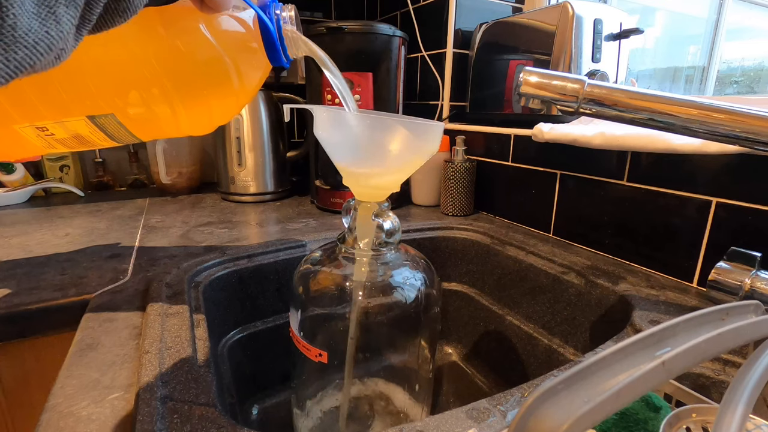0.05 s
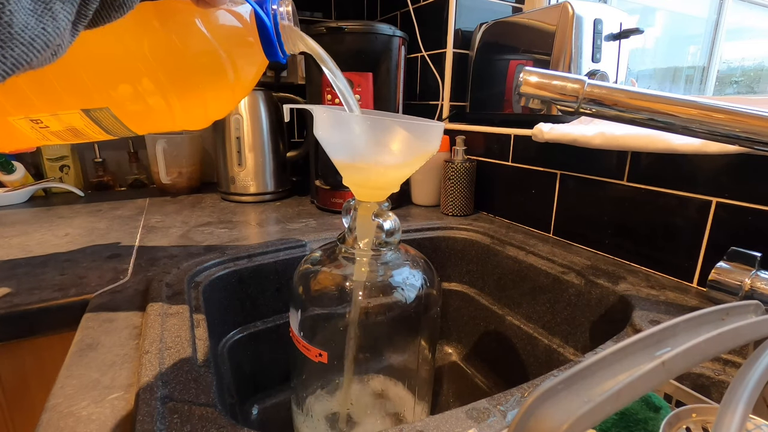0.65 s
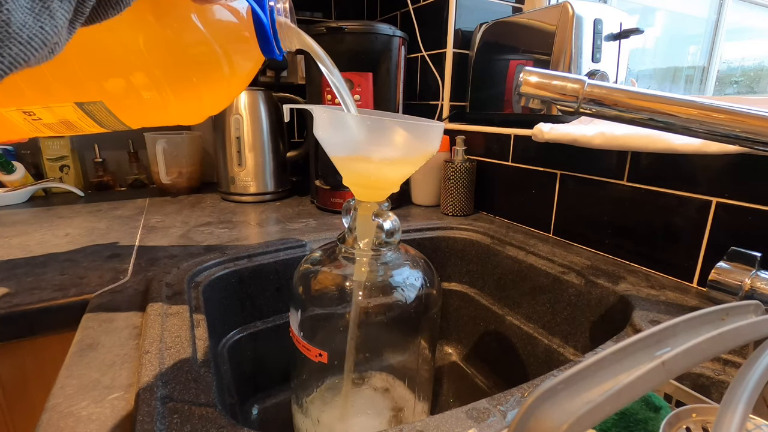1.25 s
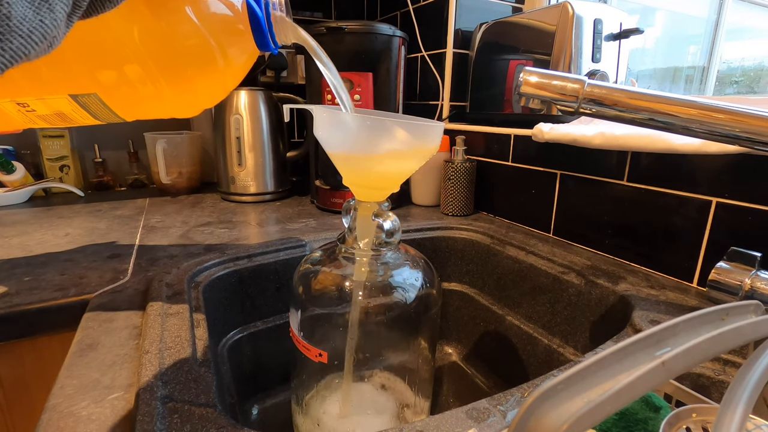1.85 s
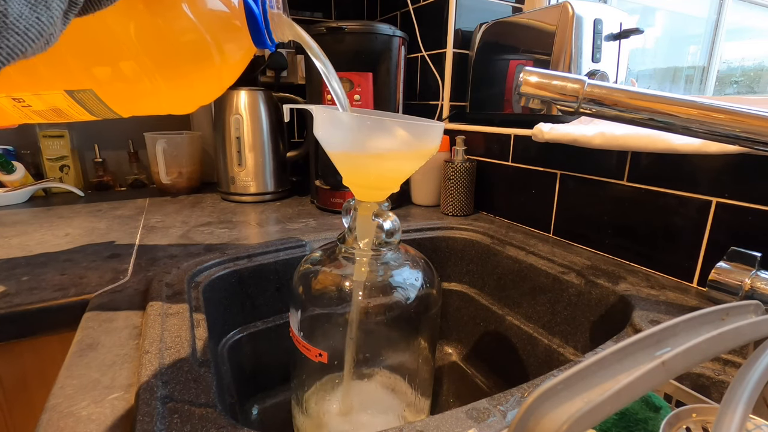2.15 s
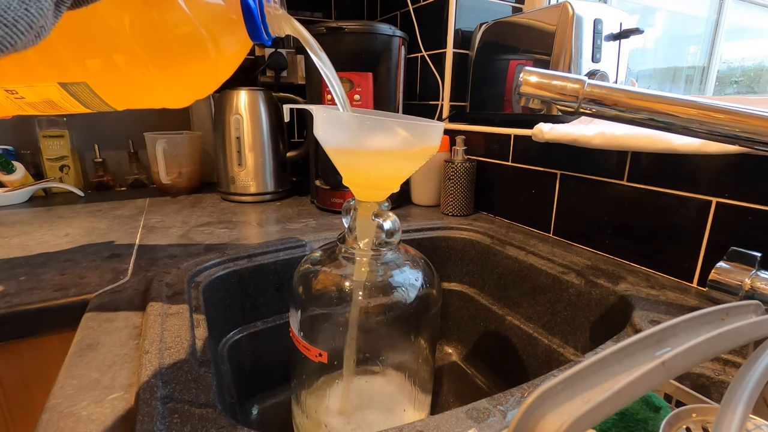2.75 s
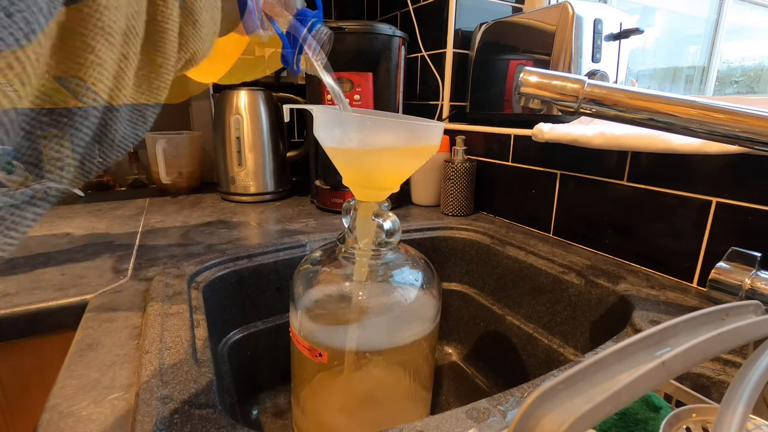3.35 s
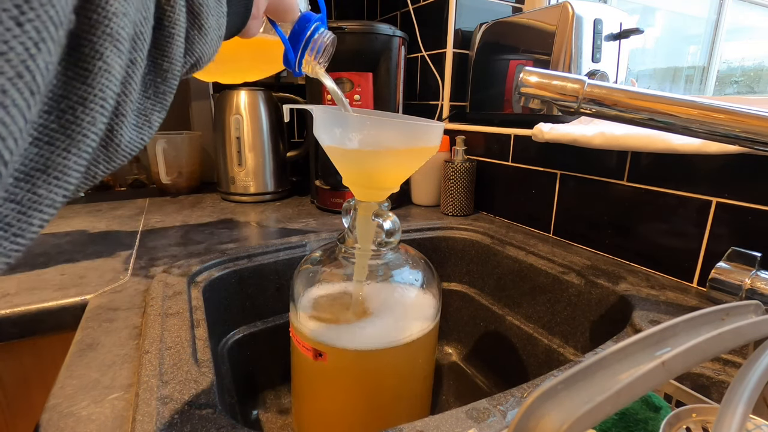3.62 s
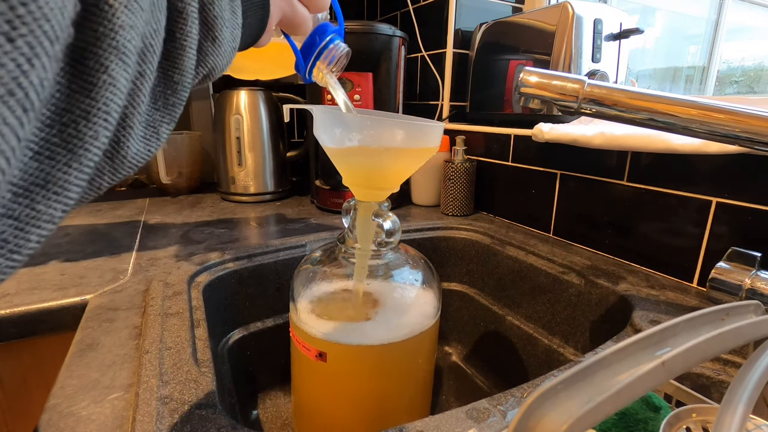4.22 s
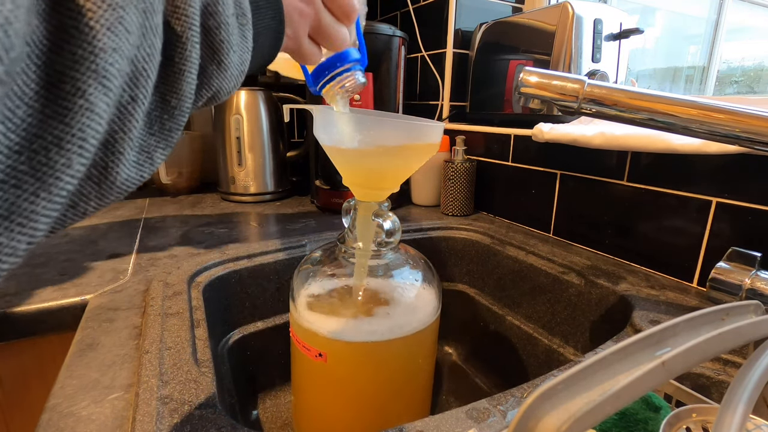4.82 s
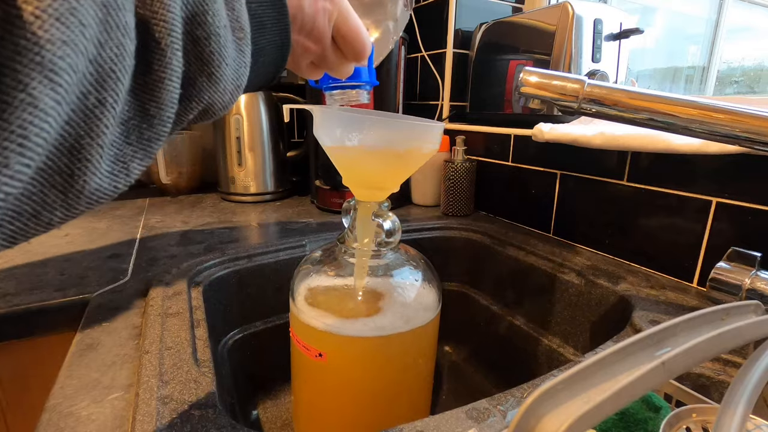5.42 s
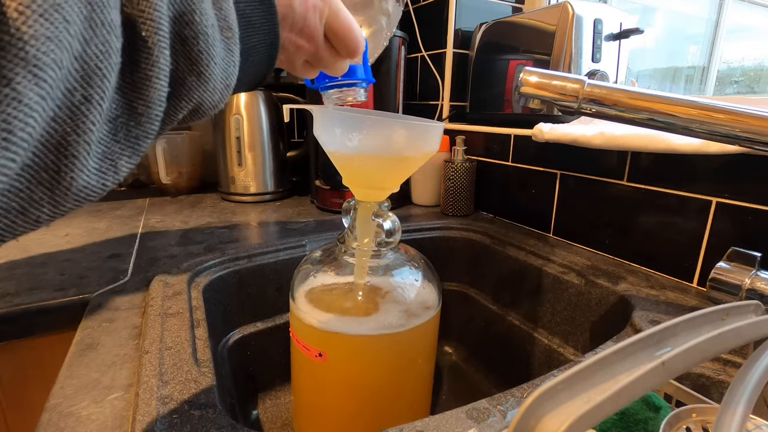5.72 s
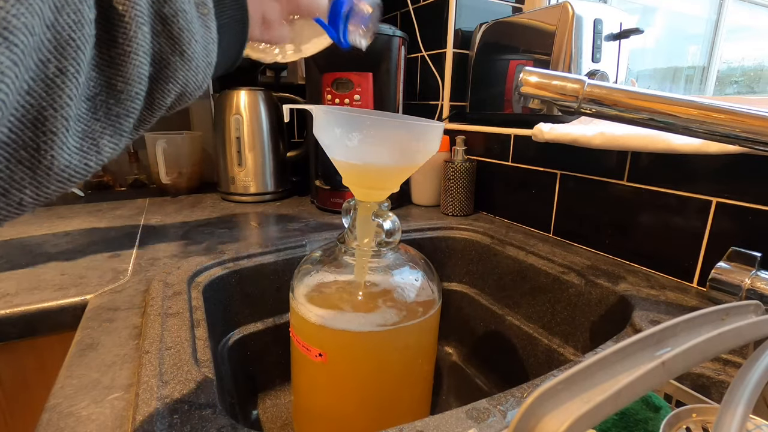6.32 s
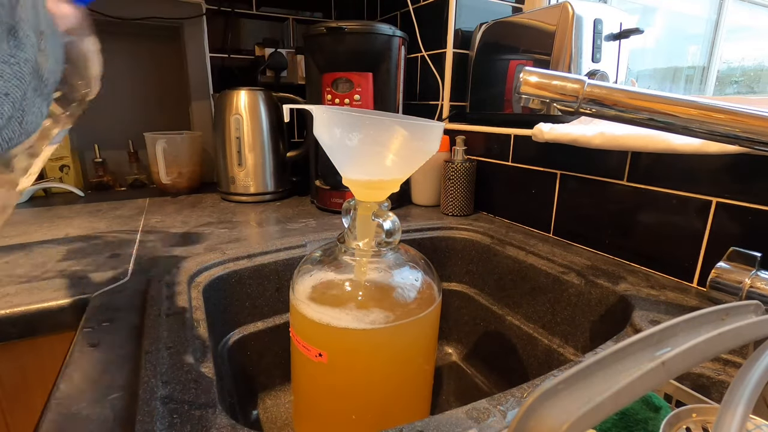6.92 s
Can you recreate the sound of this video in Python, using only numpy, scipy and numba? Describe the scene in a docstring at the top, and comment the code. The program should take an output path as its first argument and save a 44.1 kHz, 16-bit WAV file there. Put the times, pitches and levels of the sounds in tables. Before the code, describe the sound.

Liquid pours and bubbles into a large glass jar, thinning to a tinkling trickle before the funnel glugs and a bottle thumps on the worktop.

```python
"""A small kitchen, a stereo microphone close to the sink, an appliance humming in the background.
A drink gushes from a plastic bottle through a funnel into a big glass jar, and clouds of bubbles ring the
air inside, bright while it is nearly empty. From 3.4 s the jar is nearly full and burbles softly under
foam. Just after 5 s the dregs spatter into the funnel and the stream thins to a tinkling dribble.
The funnel glugs as it drains, and at 7 s the bottle knocks down on the worktop."""
import sys
import numpy as np
from scipy import signal
from scipy.fft import rfft, irfft, next_fast_len
from scipy.io import wavfile
from scipy.ndimage import map_coordinates
from numba import njit

SR = 44100
rng = np.random.default_rng(int(sys.argv[2]) if len(sys.argv) > 2 else 0)


def generate_wav(sig):
    """Save sig (samples, or channels by samples) to the path in sys.argv[1] as 16-bit PCM at SR."""
    pcm = np.round(np.clip(np.atleast_2d(sig).T, -1, 1) * 32767).astype(np.int16)
    wavfile.write(sys.argv[1], SR, pcm)


N = 316108
T = np.arange(N) / SR

# Appliance hum. Each row: pitch in Hz, level in dB.
HUM_TONES = [(98.5, -59), (199, -68.5)]
# Room tone, its stereo side signal and a rumble. Each row: frequency in Hz, gain in dB.
ROOM_TONE = [(20, -4), (45, -7), (70, -9), (100, 8), (135, -18.5), (195, -3.5), (260, -27), (340, -22),
             (420, -23), (750, -33), (1250, -30), (3300, -34), (8000, -40), (13000, -53)]
ROOM_TONE_SIDE = [(60, -8.5), (150, -5.5), (400, 1.5), (1200, 2), (4000, -2)]
RUMBLE = [(20, -43), (45, -16), (65, -2.5), (105, -4), (135, -14.5), (400, -30), (2000, -77)]
# Mid and side echo, then the tone at each side of the microphone. Each row: frequency in Hz, gain in dB.
ECHO_MID = [(60, -30), (350, -19), (700, -8), (2000, -3), (6000, -1), (13000, -1)]
ECHO_SIDE = [(60, -27), (350, -14), (700, -11), (1500, -9.5), (2800, -6.5), (5500, -3.5), (12000, -7.5)]
LEFT_TONE = [(100, -.3), (400, 0), (1500, -1.2), (5000, -2.8), (11000, -3.7)]
RIGHT_TONE = [(100, .2), (400, -.6), (1500, -1.1), (5000, -1.6), (11000, -1.3)]

# Modes of bottle and worktop, funnel and jar wall. Each row: pitch in Hz, level in dB, T60 in seconds.
WORKTOP_MODES = [(65.7, -21, 0.75), (84.6, -24.5, 0.68), (113.7, -10, 0.078), (127, -27, 0.25),
                 (218, -42.5, 0.55), (307, -27, 0.24), (354, -25.5, 0.36), (390, -29, 0.12),
                 (445.7, -36.5, 0.4), (485, -32.5, 0.12), (654, -34.5, 0.16), (720, -39, 0.16),
                 (795, -43, 0.25), (900, -46, 0.31), (1048, -38.5, 0.11), (1187, -31, 0.082),
                 (1245, -44, 0.3), (1710, -37, 0.19), (2020, -62, 0.33)]
FUNNEL_MODES = [(1197, -48.5, 0.2), (1274, -47, 0.21), (1750, -56, 0.1)]
GLASS_MODES = [(1881, -18, 0.14), (2331, -10, 0.12)]
# Modes of the air in the jar at three fill levels, and of the liquid with the sink under it.
# Each row: pitch in Hz, bandwidth in Hz, dB over the direct sound.
EMPTY_JAR_MODES = [(813, 75, 7), (1058, 106, 13), (1280, 15, 13.5), (1627, 20, 9.5), (1900, 40, 12),
                   (2110, 180, 9), (2312, 34, 13.5), (2506, 54, 0.5), (3100, 32, -16)]
FULL_JAR_MODES = [(550, 57, 12.5), (764, 79, 17), (1130, 110, 6), (1253, 22, 11), (1480, 31, 7.5),
                  (2520, 520, -5), (2830, 50, -8), (5450, 680, -26), (7800, 600, -14)]
BRIM_JAR_MODES = [(570, 12, 12.6), (1140, 90, 11.6), (1262, 40, 15.4), (1498, 15, 14.6), (2680, 100, 11),
                  (2930, 110, 12), (3320, 50, 17.6), (4840, 70, 5.9), (5140, 38, 6.2), (5200, 72, 4.7),
                  (6020, 170, 12)]
SINK_MODES = [(163.4, 22, 11), (215, 13.4, 20), (328, 14.6, 10)]
# Tone of the surface: bare, under foam, up at the neck. Each row: frequency in Hz, gain in dB.
BARE_TONE = [(200, 15), (550, 0.5), (800, 6), (1500, -6.5), (3000, -5), (4300, 1.5), (7000, -8),
             (10000, -16), (13000, -26)]
FOAMY_TONE = [(200, 22), (600, -18.5), (1100, -0.5), (1800, -4.5), (3000, -7), (4000, -13), (5800, -11.5),
              (6800, -19), (8500, -16), (10500, -30), (13000, -22)]
NECK_TONE = [(200, -15), (700, -9.5), (1100, -8.5), (1800, 0.5), (3000, -9), (4200, -2.5), (5800, 3),
             (6800, -25), (9000, -2), (10500, -44), (13000, -25)]
# Tone of the bottle's crack, spout pop, dregs, churning and mist. Each row: frequency in Hz, gain in dB.
CRACK_TONE = [(100, 14), (400, 11.5), (1200, -0.5), (2700, -2), (4000, -6.5), (5500, -15), (8000, -22),
              (13000, -46)]
POP_TONE = [(150, 11), (400, 17), (800, -13), (1250, 5.5), (2200, -9), (4000, -7.5), (6000, -18),
            (9000, -26), (13000, -52)]
DREGS_TONE = [(900, -12), (1600, -4), (2600, 0.5), (3500, -3), (4800, -6.5), (6000, -13), (7500, -19),
              (11000, -28)]
CHURN_TONE = [(70, -20), (160, 6.5), (240, 2.5), (330, -2.5), (420, -9.5), (600, 4.5), (1200, -36)]
MIST_TONE = [(6500, -0.5), (13500, -15)]

# The bottle meets the worktop. Each row: start in seconds, body in dB, crack in dB, loss in dB an octave.
BOTTLE_BLOWS = [(7.045, -24, -26, 0.5), (7.0499, 1.5, -27.5, 0), (7.088, -7.5, -43, 1)]
# Air breaks through the spout.
# Each row: start in seconds, peak in dB, pitch in Hz, glide in octaves a second, swell in seconds.
SPOUT_GLUGS = [(5.931, -47.5, 102, -3.5, 0.034), (6.762, -39, 295, -8, 0.0073),
               (6.775, -29.5, 339, -0.5, 0.013), (6.807, -40.5, 296, 4.5, 0.016),
               (6.838, -41, 332, 1.5, 0.011), (7.009, -39.5, 487, -15.5, 0.011),
               (7.028, -38.5, 380, 1.5, 0.012)]
# Collapsing foam, drops under the neck, deep gulps. Each row: start in seconds, level in dB, pitch in Hz.
FOAM_CRACKLES = [(3.52, -74, 7600), (3.631, -70, 7500), (3.771, -64, 4700), (3.816, -64.5, 6650),
                 (3.953, -63, 6100), (4.318, -67, 5400), (4.366, -64, 5640), (4.416, -67, 5500),
                 (4.461, -66, 4840), (4.5, -71, 7500), (4.706, -67, 5600)]
NECK_DRIPS = [(5.26, -55, 3150), (5.297, -60, 3170), (5.343, -63, 2790), (5.565, -59, 5600),
              (5.608, -60, 3320), (5.632, -58, 3260), (5.6835, -63, 2870), (5.772, -55, 3300),
              (5.821, -53, 2930), (5.857, -64, 5500), (5.888, -60, 6000), (5.906, -60, 2900),
              (5.935, -57, 5770), (5.9487, -52, 5060), (6.028, -56, 2930), (6.042, -60, 5970),
              (6.05, -59, 2910), (6.074, -60, 3250), (6.11, -60, 5200), (6.144, -59, 5670),
              (6.183, -66, 6080), (6.228, -61, 5770), (6.268, -64, 6050), (6.284, -63, 5370)]
DEEP_GULPS = [(0.273, -38, 220), (0.3, -39, 230), (0.396, -37.5, 203), (0.49, -36, 223), (0.62, -46, 240),
              (0.779, -42, 222), (0.914, -33, 232), (1.068, -51, 208), (1.872, -34.5, 220),
              (1.986, -37, 207), (2.29, -34.5, 204), (2.543, -42, 333), (2.552, -43, 563),
              (2.611, -37.5, 238), (2.621, -40, 330), (2.846, -38, 195), (3.045, -33, 212),
              (3.054, -45, 325), (3.075, -51, 464), (3.098, -39, 308), (3.127, -35, 197.6),
              (3.427, -47, 215), (3.528, -43.5, 161), (3.585, -50, 505), (3.807, -45, 158),
              (3.902, -42, 174), (3.925, -53, 317), (3.958, -40.5, 197), (3.975, -54, 590),
              (4.138, -49, 216), (4.186, -40, 164), (4.26, -41, 214), (4.335, -42, 195), (4.385, -34, 210),
              (4.41, -45, 348), (4.52, -49, 595)]
# Sliding runs of bubbles.
# Each row: start and length in seconds, first and last pitch in Hz, level in dB, scatter in octaves.
SLURP_RUNS = [(0.324, 0.028, 2100, 2210, -58, 0.26), (0.449, 0.017, 2230, 2230, -71, 0.26),
              (0.503, 0.21, 803, 827, -61.5, 0.18), (0.732, 0.03, 2180, 2320, -52.5, 0.12),
              (0.889, 0.016, 2080, 2570, -50, 0.33), (0.903, 0.017, 2600, 574, -48.5, 0.77),
              (1.303, 0.004, 2320, 2520, -43, .25), (1.586, 0.0042, 4200, 4560, -57, 0.65),
              (1.822, 0.029, 1750, 1400, -55.5, 0.12), (1.916, 0.044, 1390, 1160, -56, 0.23),
              (1.971, 0.018, 10500, 8400, -63.5, 0.5), (2.012, 0.035, 1350, 1560, -55.5, 0.42),
              (2.05, 0.028, 4100, 4360, -55, 0.67), (2.193, 0.035, 2060, 1550, -57, 0.13),
              (2.535, 0.12, 2200, 2350, -59.5, 0.41), (2.603, 0.014, 675, 985, -47.5, 0.29),
              (4.922, 0.024, 10900, 11500, -68, 0.28), (4.925, 0.0084, 2290, 2400, -50, 0.17),
              (5.027, 0.014, 1900, 2190, -55, .8), (5.058, 0.015, 4270, 3720, -54.5, 0.28),
              (5.948, 0.006, 5340, 4930, -56, 0.22)]
# Splashes. Each row: start in seconds, peak in dB, pitch in Hz, spatter in dB over the first bubble.
SINGLE_SPLASHES = [(0.113, -41.5, 2100, -12), (0.26, -41, 2470, -14), (0.318, -33.5, 2140, -19),
                   (0.438, -35.5, 2270, -21), (0.566, -36.5, 2030, 13), (0.737, -38, 2300, -26),
                   (0.774, -39.5, 2303, -6), (0.911, -39.5, 1480, 1), (1.047, -55, 1280, -17),
                   (1.181, -44, 2060, 7), (1.277, -46, 2350, -8), (1.307, -44, 1280, -12),
                   (1.867, -42.5, 900, 5), (1.994, -39, 857, 15), (2.05, -37, 2340, 3),
                   (2.616, -49, 2420, -12), (3.046, -42, 1887, -5), (3.962, -42.5, 1140, -7),
                   (4.142, -48, 815, 4), (4.293, -51.5, 1180, -7), (4.39, -44.5, 1020, -6),
                   (4.719, -46.5, 1256, -24), (5.904, -51.5, 1280, -5), (5.949, -49, 1130, -8),
                   (6.651, -57, 1290, -18)]
# The stream wanders near the wall and it sings. Each row: start and length in seconds, level in dB.
GLASS_SINGS = [(1.733, 0.016, -49), (2.49, 0.06, -52.5), (2.677, 0.053, -53.5), (2.959, 0.016, -51),
               (3.058, 0.02, -58), (3.17, 0.012, -58.5)]
# How hard the drink runs. Each row: time in seconds, flow in dB.
FLOW_CURVE = [(0, 0.5), (0.18, -2.5), (0.55, -0.5), (1.15, 0), (1.7, 2), (2.2, 2), (2.6, 4.5), (2.8, 1.5),
              (3.12, 2), (3.36, -7), (3.45, -2), (3.65, 1), (4.25, -5), (4.85, -2.5), (5.36, -8.5),
              (5.55, -4), (6.15, -8), (6.4, -13), (7.1, -9)]
# The stream plunges deeper (surges), sprays off the glass, or drags air under (gurgles).
# Each row: start and length in seconds, swell in dB. Each layer takes only a share of a surge.
STREAM_SURGES = [(0.25, 0.09, 9), (0.49, 0.11, 6), (0.91, 0.05, 7), (1.06, 0.04, 4), (1.44, 0.06, 3),
                 (1.87, 0.04, 6), (1.98, 0.08, 6.5), (2.28, 0.05, 5), (2.54, 0.11, 6.5), (2.92, 0.06, 7),
                 (3.045, 0.1, 13), (3.23, 0.06, 7), (3.43, 0.16, 5), (3.91, 0.08, 9), (4.14, 0.08, 8),
                 (4.27, 0.09, 6), (4.37, 0.07, 10), (4.54, 0.03, 6), (4.85, 0.03, 6), (5.79, 0.04, 7)]
WALL_SPRAYS = [(0.258, 0.01, 4), (0.57, 0.05, 2.5), (0.775, 0.01, 3.5), (0.91, 0.04, 4), (1.585, 0.01, 4.5),
               (1.995, 0.06, 5), (2.47, 0.13, 4), (3.07, 0.03, 6)]
AIR_GURGLES = [(0.242, 0.036, 15.5), (0.5, 0.04, 13.5), (0.597, 0.079, -6), (1.986, 0.018, 7),
               (2.2, 0.037, 4.5), (2.47, 0.073, 1), (2.65, 0.022, 1), (3.043, 0.076, 2),
               (3.585, 0.017, 3.5), (3.655, 0.056, 3.5), (3.89, 0.011, 2), (3.98, 0.015, 2.5),
               (4.042, 0.018, 8), (4.143, 0.058, 5), (4.335, 0.039, 7.5), (4.39, 0.024, 4),
               (4.515, 0.068, 6.5), (4.79, 0.02, 2.5), (4.858, 0.021, 4), (5.12, 0.02, 5),
               (5.466, 0.025, 6), (5.66, 0.041, 4.5), (5.804, 0.025, 5.5), (6.08, 0.07, 1.5)]

SKIN_S, FOAMY_S, BRIM_S = 0.88, 3.397, 5.26  # first skin of foam, jar nearly full, full to the neck
ROOM_T60_S = 0.4
# Each triple: large bubbles, small bubbles, fizz.
GUSH_DB, TRICKLE_DB, DRIBBLE_DB = (-69, -54, -61.5), (-60.5, -66, -74.5), (-62.5, -67, -72.5)
SURGE_SHARE, FLUTTER_DB = (0.2, 0.042, 0.024), (0.3, 0.97, 0.95)
BARE_DB = (-3, 3, 7)  # brighter until the skin of foam closes
DEEPEN_DB_PER_S = (2.5, -2, -1.96)  # the deepening pool favours large bubbles
FOAM_DB_PER_S = (0.3, 1.4, 5)  # fizz gains on the burble as the foam thickens


def undb(db):
    """Decibels to gain."""
    return 10 ** (np.asarray(db) / 20)


def unit(x):
    """Scale to rms 1."""
    return x / np.sqrt(np.mean(x ** 2))


def colour(x, points):
    """Filter by a curve of (Hz, dB) points."""
    hz, db = np.transpose(points)
    padded = np.pad(x, (0, 2048), "reflect", reflect_type="odd")
    size = next_fast_len(len(padded) + 4096)
    bin_hz = np.maximum(np.fft.rfftfreq(size, 1 / SR), 1)
    gain = undb(np.interp(np.log(bin_hz), np.log(hz), db))
    return irfft(rfft(padded, size) * gain, size)[:len(x)]


def convolve(x, response):
    """Pass a sound through an impulse response."""
    return signal.fftconvolve(x, response)[:len(x)]


def add(out, x, s):
    """Mix a short sound in at s seconds."""
    start = int(s * SR)
    out[start:start + len(x)] += x[:max(N - start, 0)]


def walk(moves_per_s):
    """Smooth random drift with a spread near 1."""
    return map_coordinates(rng.standard_normal(1000), [T * moves_per_s], order=3, mode="wrap")


def after(s):
    """Rises from 0 to 1 over 0.12 s around time s."""
    return np.clip(.5 + (T - s) / 0.12, 0, 1)


def plateau(s, length, attack_s, release_s):
    """Rises to 1 by time s, holds and ebbs."""
    return np.interp(T, [s - attack_s, s, s + length, s + length + release_s], [0, 1, 1, 0])


def swell_db(events):
    """The highest of the surges, sprays or gurgles at each moment."""
    return np.max([db * plateau(s, length, 0.017, 0.025) for s, length, db in events], axis=0)


def flow_db():
    """Strength of the stream over time."""
    return np.interp(T, *np.transpose(FLOW_CURVE))


def cavity(modes):
    """Impulse response: the direct sound plus ringing resonances."""
    t = T[:SR // 5]
    ringing = sum(undb(db) * 2 * np.pi * width / SR * np.exp(-np.pi * width * t)
                  * np.cos(2 * np.pi * hz * t) for hz, width, db in modes)
    return ringing + (t == 0)


def ring(modes):
    """A struck object: its modes fade, each at its own rate."""
    t = T[:SR // 3]
    return sum(undb(db - 60 * t / t60) * np.sin(2 * np.pi * hz * t) for hz, db, t60 in modes)


def burst(tone, main_t60_s, weak_t60_s, weak_db):
    """A sharp crack of noise that fades at two rates."""
    t = T[:SR // 3]
    fall = undb(-60 * t / main_t60_s) + undb(weak_db - 60 * t / weak_t60_s)
    return unit(colour(rng.standard_normal(len(t)), tone)) * fall * np.minimum(t / 0.00045, 1)


@njit
def bubbles(length, start, hz, cycles, size, rise):
    """Each bubble swells in a cycle, rings down 60 dB over its cycles and rises in pitch near the top."""
    out = np.zeros(length)
    for k in range(len(start)):
        life = int(cycles[k] * SR / hz[k]) + 2
        step = 2 * np.pi * hz[k] / SR
        wave = size[k] + 0j
        turn = np.exp(1j * step - np.log(1000.) / life)
        glide = np.exp(1j * step * rise / life)
        for i in range(min(life, length - start[k])):
            wave *= turn
            turn *= glide
            out[start[k] + i] += wave.imag * min(i * hz[k] / SR, 1.)
    return out


def cloud(lo_hz, hi_hz, cycles, spread_db, rise, count):
    """Bubbles of one size class at random moments: many weak, a few strong."""
    when, pitch, life, force = rng.random((count, 4)).T
    hz = lo_hz * (hi_hz / lo_hz) ** pitch
    size = hz * undb(-spread_db * np.log(1 - .99 * force))
    return bubbles(N, (when * N).astype(np.int64), hz, cycles * (.5 + life), size, rise)


def single_bubbles(rows, cycles, rise):
    """One bubble for each row of start, level and pitch."""
    s, db, hz = np.transpose(rows)
    return bubbles(N, (s * SR).astype(np.int64), hz, np.full(len(s), cycles), undb(db), rise)


def bubble_run(length, first_hz, last_hz, db, octaves, cycles, count=28):
    """A quick run of bubbles, scattered about a sliding pitch."""
    jitter, detune, force = rng.random((3, count))
    along = (np.arange(count) + jitter) / count
    start = (along * length * SR).astype(np.int64)
    hz = first_hz * (last_hz / first_hz) ** along * 2 ** (octaves * (detune - .5))
    run = bubbles(SR // 4, start, hz, np.full(count, cycles), undb(-10 * force), 0.029)
    return run * undb(db) / np.sqrt(np.sum(run ** 2) / (length * SR))


def kitchen():
    """A wavering appliance hum and a low rumble in the centre, room tone all round the microphone."""
    hum = sum(undb(db + 1.1 * walk(20)) * np.sin(2 * np.pi * hz * T + 1.13 * walk(8))
              for hz, db in HUM_TONES)
    mid, side = (undb(-59.5 + walk(3.8)) * unit(colour(rng.standard_normal(N), ROOM_TONE))
                 for _ in range(2))
    rumble = undb(np.interp(T, [4.5, 6.5], [-60, -66])) * unit(colour(rng.standard_normal(N), RUMBLE))
    return hum + mid + rumble + np.outer([1, -1], colour(side, ROOM_TONE_SIDE))


def echo(x, paths=6):
    """Short diffuse echo; its paths shift as the splash wanders about."""
    t = T[:SR // 3]
    fall = undb(-60 * t / ROOM_T60_S) * (t > .002)
    fall *= 1 + 9.3 * np.exp(-t / 0.003)  # the near walls answer first
    fall /= np.sqrt(np.sum(fall ** 2))
    shares = np.array([walk(7) for _ in range(paths)])
    shares /= np.sqrt(np.sum(shares ** 2, axis=0))
    return sum(share * convolve(x, fall * rng.standard_normal(len(t))) for share in shares)


def room(x):
    """Tiles and sink answer differently on each side of the microphone, most in the treble."""
    mid = x + echo(colour(x, ECHO_MID))
    side = echo(colour(x, ECHO_SIDE))
    return np.array([colour(mid + side, LEFT_TONE), colour(mid - side, RIGHT_TONE)])


def knock(push_cycles=0.97):
    """The bottle lands on its rim, settles and rocks once; the worktop booms."""
    out, t = np.zeros(N), T[:SR // 3]
    lowest_hz = WORKTOP_MODES[0][0]
    for s, body_db, crack_db, dull_db in BOTTLE_BLOWS:
        body = 0
        for hz, db, t60 in WORKTOP_MODES:
            push = np.minimum(t * hz / push_cycles, 1)  # soft plastic: the deep modes build up last
            body += push * ring([(hz, db - dull_db * np.log2(hz / lowest_hz), t60)])
        add(out, undb(body_db) * body + undb(crack_db) * burst(CRACK_TONE, 0.025, 0.22, -8.5), s)
    return out


def glugs(jar):
    """Slugs of air swell and ring in the draining spout, and a film pops and rings the funnel."""
    out, t = np.zeros(N), T[:SR // 5]
    for s, db, hz, glide, swell_s in SPOUT_GLUGS:
        age = t / swell_s
        phase = 2 * np.pi * np.cumsum(hz * 2 ** (glide * t)) / SR
        add(out, undb(db) * age * np.exp((1 - age ** 2) / 2) * np.sin(phase), s)
    add(out, undb(-45) * burst(POP_TONE, 0.072, 0.29, -1.2) + ring(FUNNEL_MODES), s=6.763)
    rush = burst(POP_TONE, 0.68, 0.35, -16)  # air is sucked down after the last liquid
    rush *= np.minimum(T[:len(rush)] / 0.015, 1)
    add(out, undb(-51.5) * convolve(rush, jar), s=7.011)
    return out


def drips():
    """The last thread breaks into drops, each trapping one small bubble."""
    return single_bubbles(NECK_DRIPS, cycles=113, rise=0.023)


def dregs():
    """The last of the drink spatters into the funnel in one broad, rough burst."""
    spatter = unit(colour(cloud(900, 12000, 12, 3, .05, count=30000), DREGS_TONE))
    return undb(-56.5) * plateau(s=5.072, length=0.057, attack_s=0.049, release_s=0.11) * spatter


def crackles():
    """The stream tears the foam, and many tiny bubbles burst together."""
    out = np.zeros(N)
    for s, db, hz in FOAM_CRACKLES:
        add(out, bubble_run(0.006, hz, hz, db, octaves=0.68, cycles=33), s)
    return out


def slurps():
    """A closing pocket of air sheds bubbles of steadily changing size."""
    out = np.zeros(N)
    for s, length, first_hz, last_hz, db, octaves in SLURP_RUNS:
        add(out, bubble_run(length, first_hz, last_hz, db, octaves, cycles=47), s)
    return out


def splashes(empty_jar, full_jar, count=14):
    """One bubble plinks, and at once a short spatter of mostly smaller ones follows."""
    out = np.zeros(N)
    follower = np.arange(count) > 0
    cycles = np.where(follower, 31, 64)
    for s, db, hz, spatter_db in SINGLE_SPLASHES:
        delay, pitch, force = rng.random((3, count)) * follower
        start = (delay ** 2 * .018 * SR).astype(np.int64)
        pitches = hz * 2 ** (2 * pitch - .5 * follower)
        size = undb(spatter_db * follower - 10 * force)
        splash = bubbles(SR // 4, start, pitches, cycles, size, 0.02)
        splash = convolve(splash, empty_jar if s < FOAMY_S else full_jar)
        add(out, splash / np.abs(splash).max() * undb(db), s)
    return out


def glass():
    """Small impacts ring the nearly empty jar's wall; its lowest mode sings as the stream comes close."""
    impacts = cloud(1680, 2600, 5.3, 0.86, 0.041, count=9000)
    gain = (1 - after(FOAMY_S)) * undb(-63 - 1.7 * T + flow_db())
    patter = gain * unit(convolve(impacts, ring(GLASS_MODES)))
    swell = sum(undb(db) * plateau(s, length, 0.02, 0.035) for s, length, db in GLASS_SINGS)
    singing = undb(1.5 * walk(75)) * np.sin(2 * np.pi * GLASS_MODES[0][0] * T + .5 * walk(50))
    return patter + swell * singing


def churn():
    """Pockets of air plunge under the stream and boom through the liquid and the sink."""
    pockets = cloud(145, 475, 9.5, 0.93, 0.066, count=2600)
    boom = unit(colour(convolve(pockets, cavity(SINK_MODES)), CHURN_TONE))
    boom_db = -57 - 0.42 * T  # weaker as the fall gets shorter
    boom_db += 0.8 * flow_db() + 0.84 * swell_db(STREAM_SURGES) - 2.2 * walk(14)
    return undb(boom_db) * boom + single_bubbles(DEEP_GULPS, cycles=18, rise=0.14)


def heave(x, pitch_share=0.014, moves_per_s=7):
    """Resonances waver in pitch as the surface rocks."""
    warped_s = T + pitch_share / moves_per_s * walk(moves_per_s)
    return map_coordinates(x, [warped_s * SR], order=3, mode="mirror")


def stream(levels_db, surface, jar, clouds):
    """Large bubbles, small bubbles and fizz swell with the flow and its surges, and ring the jar."""
    out, flow, surge = 0, flow_db(), swell_db(STREAM_SURGES)
    swells = swell_db(AIR_GURGLES), 0, swell_db(WALL_SPRAYS)  # gurgles lift large bubbles, sprays fizz
    for db, share, flutter_db, swell, x in zip(levels_db, SURGE_SHARE, FLUTTER_DB, swells, clouds):
        gain = undb(db + flow + share * surge + swell + flutter_db * walk(14))
        out += gain * unit(convolve(colour(x, surface), jar))
    return heave(out)


def dribble(jar):
    """A thin thread tinkles in the small hollow left under the neck."""
    clouds = [cloud(520, 1464, 12, 1.6, 0.1, count=8000),
              cloud(1510, 3500, 18, 2.2, 0.08, count=9000),
              cloud(3250, 13300, 38, 4, 0.05, count=8000)]
    return np.sqrt(after(BRIM_S)) * stream(DRIBBLE_DB, NECK_TONE, jar, clouds)


def trickle(jar):
    """A short fall into foam: a soft burble under a fine, even fizz."""
    clouds = [cloud(507, 1510, 18, 1.6, 0.097, count=8000),
              cloud(1374, 3410, 24, 1.8, 0.054, count=8000),
              cloud(3460, 12700, 34, 3.7, 0.05, count=16000)]
    levels_db = [db + slope * (T - FOAMY_S) for db, slope in zip(TRICKLE_DB, FOAM_DB_PER_S)]
    return np.sqrt(after(FOAMY_S) * (1 - after(BRIM_S))) * stream(levels_db, FOAMY_TONE, jar, clouds)


def gush(jar):
    """The stream falls far and beats a dense spray out of the shallow liquid; depth and foam dull it."""
    clouds = [cloud(630, 1560, 15, 3.2, 0.2, count=7000),
              cloud(1380, 3580, 22, 2.5, 0.06, count=16000),
              cloud(3490, 13630, 40, 3.3, 0.03, count=60000)]
    bare = .5 - .5 * np.tanh((T - SKIN_S) / 0.16)
    levels_db = [db + slope * T + bare_db * bare
                 for db, slope, bare_db in zip(GUSH_DB, DEEPEN_DB_PER_S, BARE_DB)]
    # The finest droplets fly before the foam closes, and with each spray.
    droplets = unit(colour(cloud(6510, 13100, 54, 6.5, 0.031, count=26000), MIST_TONE))
    mist_gain = bare * undb(-62) + undb(-76) * (undb(swell_db(WALL_SPRAYS)) - 1)
    mist = mist_gain * undb(flow_db()) * droplets
    return np.sqrt(1 - after(FOAMY_S)) * stream(levels_db, BARE_TONE, jar, clouds) + mist


def scene():
    """Jar, funnel and bottle, heard from beside the sink in the same small kitchen."""
    empty_jar, full_jar, brim_jar = map(cavity, (EMPTY_JAR_MODES, FULL_JAR_MODES, BRIM_JAR_MODES))
    pour = gush(empty_jar) + glass() + trickle(full_jar) + dribble(brim_jar) + churn()
    details = splashes(empty_jar, full_jar) + slurps() + crackles() + dregs() + drips() + glugs(full_jar)
    return room(pour + details + knock()) + kitchen()


def record(dry):
    """The microphone's left capsule is one sample further away; deep rumble and top treble are cut."""
    capsules = np.array([np.append(0, dry[0, :-1]), dry[1]])
    low_cut = signal.butter(3, 36, "high", fs=SR, output="sos")
    high_cut = signal.ellip(8, .2, 70, 13900, fs=SR, output="sos")
    return signal.sosfilt(high_cut, signal.sosfilt(low_cut, capsules))


dry = scene()
out = record(dry)
generate_wav(out)
```